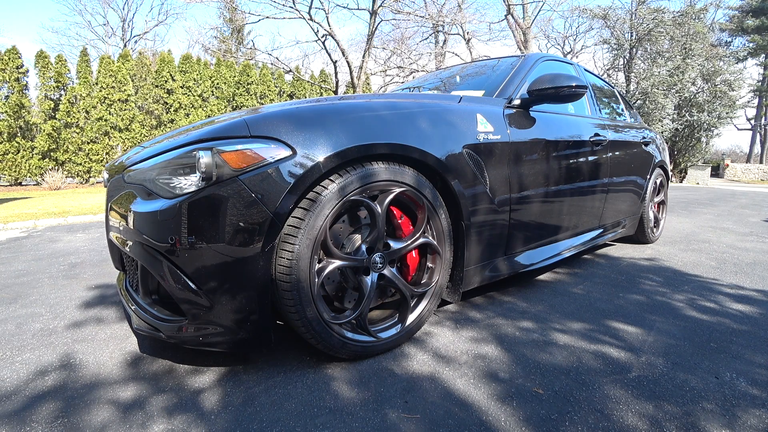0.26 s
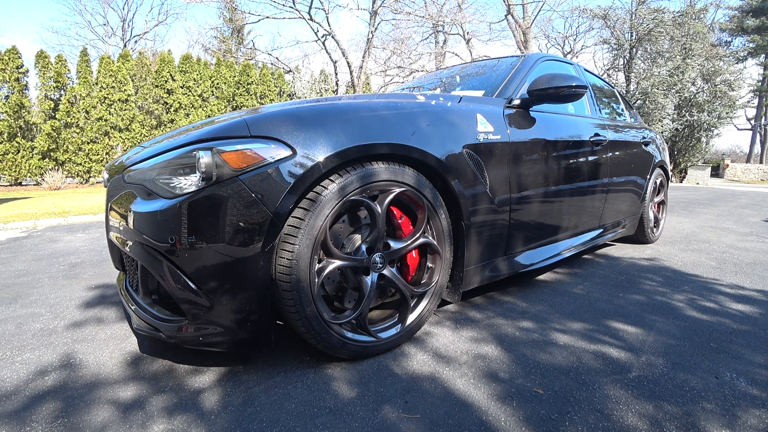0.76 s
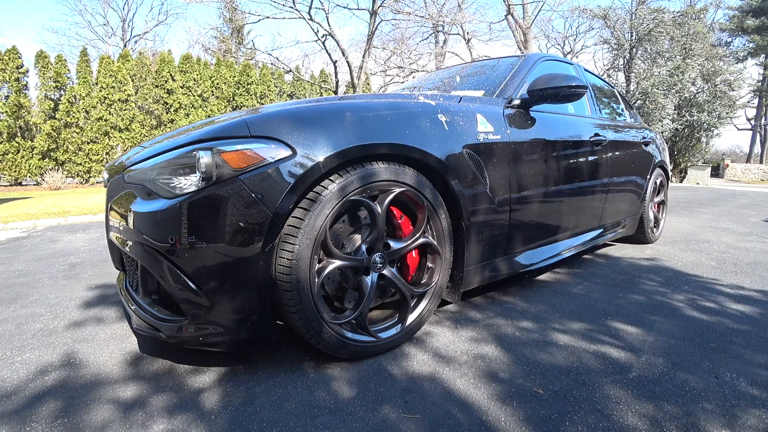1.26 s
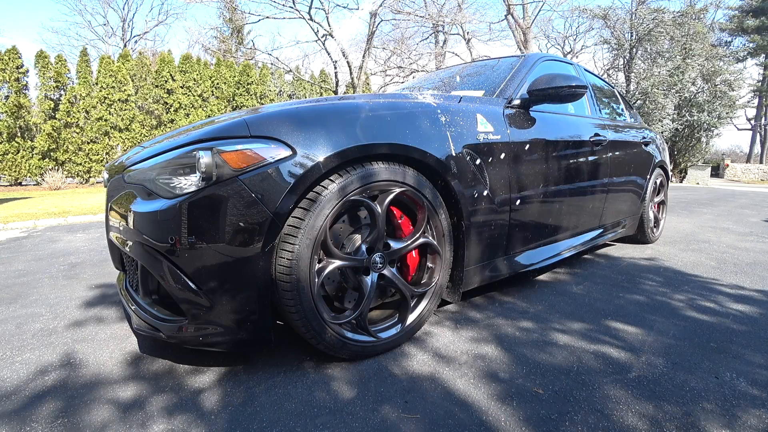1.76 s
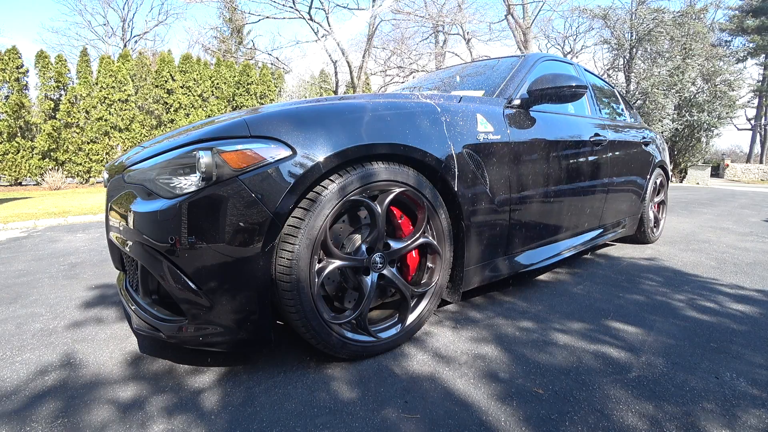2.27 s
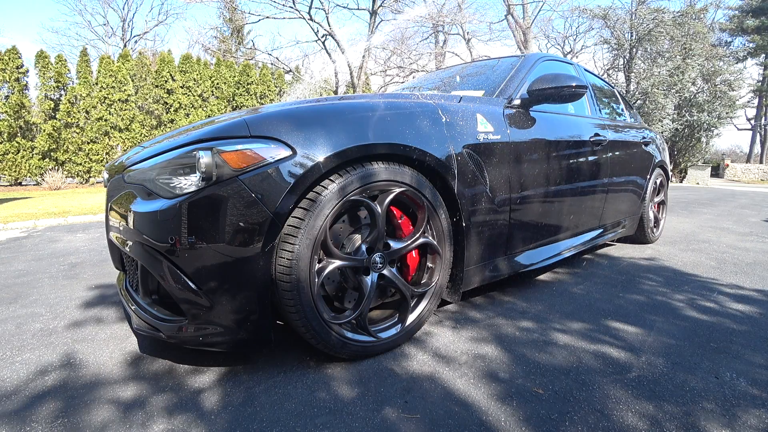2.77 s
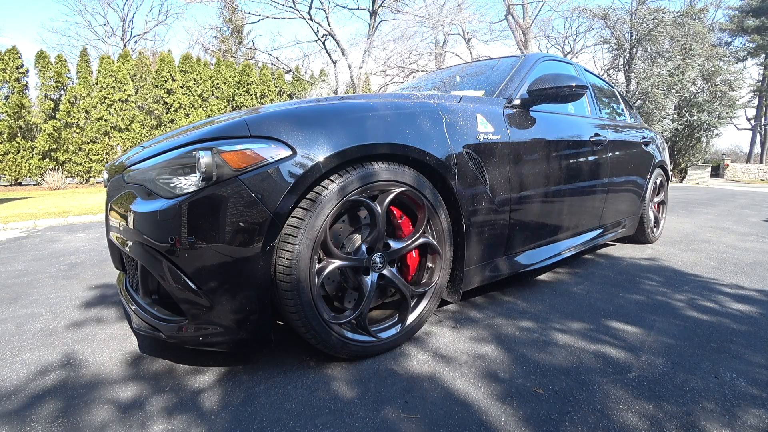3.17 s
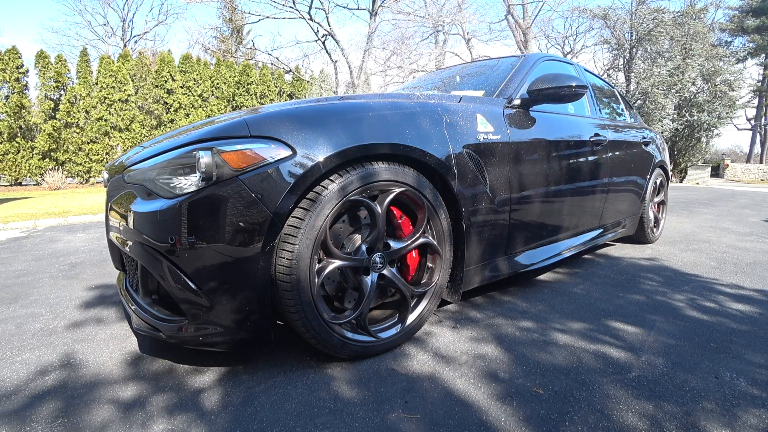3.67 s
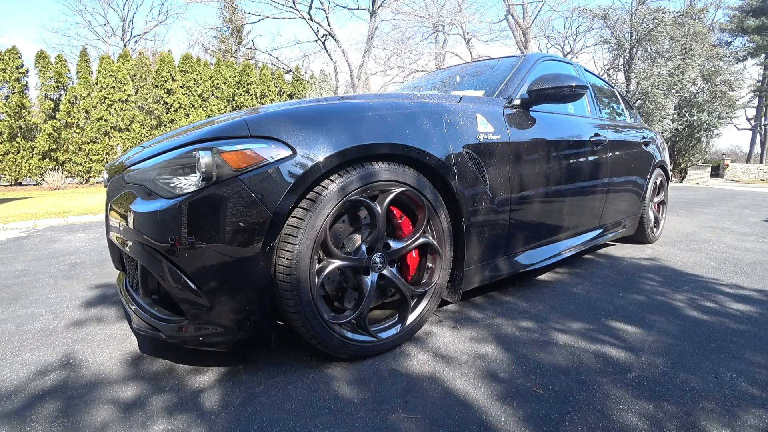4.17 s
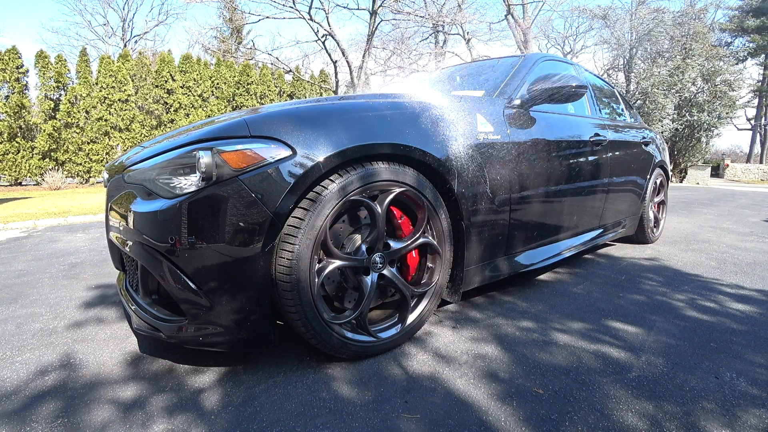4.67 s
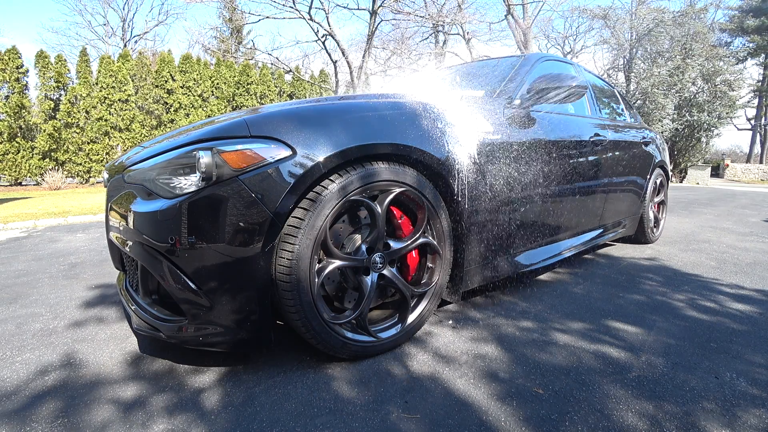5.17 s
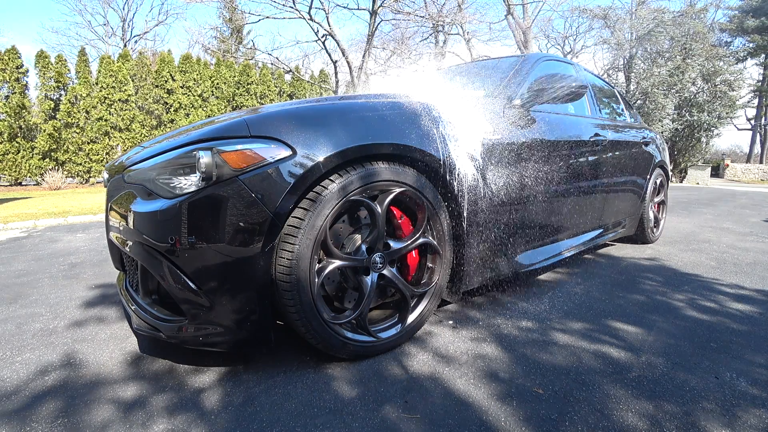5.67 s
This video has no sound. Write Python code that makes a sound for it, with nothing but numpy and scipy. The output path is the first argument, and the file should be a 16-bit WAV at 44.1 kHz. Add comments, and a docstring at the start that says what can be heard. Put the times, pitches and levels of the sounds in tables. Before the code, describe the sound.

A pressure washer with a foam cannon fires a short hissing burst that ends in a sputter, a few valve ticks and a faint metallic ring. After a brief pause the jet starts again and runs steadily, wet at first, then as a softer foamy hiss, and finally a little brighter as it hits a car. The spray is close and slightly to the right, in a quiet open driveway, with a faint pump whine behind it.

```python
"""A hissing spray, a little to the right: a pressure washer with a foam cannon on a car in an open driveway.
A short trial burst ends in a sputter, a few valve ticks and a ringing lance; then the jet runs steadily,
wet at first, then as a plume of foam, at last onto the paint. The jet is turbulence shaped by nozzle
resonances and echoed by asphalt and car. Behind it: a faint pump whine, one far bird, outdoor air."""
import sys
import numpy as np
from scipy import signal
from scipy.fft import rfft, irfft
from scipy.io import wavfile
from scipy.ndimage import map_coordinates

SR = 44100
rng = np.random.default_rng(int(sys.argv[2]) if len(sys.argv) > 2 else 0)


def wrap_up_sound(samples):
    """Save the sound to the file named by the first command line argument, as 16-bit audio."""
    columns = np.atleast_2d(samples).T
    # keep every value between -1 and 1, then stretch to whole-number steps
    tamed = np.clip(columns, -1, 1)
    steps = np.round(tamed * 32767).astype(np.int16)
    wavfile.write(sys.argv[1], SR, steps)


N = 261072
TIME = np.arange(N) / SR
HZ = np.maximum(np.arange(N // 2 + 1) * SR / N, 1)
CUTOFF_HZ = 11150
SAG_WIDTH_S = 0.061

# trigger pulls: (opens [s], shuts [s], rise [s], deepest pressure sag [s], sag depth [dB])
TRIGGER_PULLS = [(0.304, 0.6644, 0.0078, 0.483, 9), (1.2352, 6.5, 0.0011, 1.455, 8)]
# stereo image of the spray: (frequency [Hz], left-right correlation [0..1])
SPRAY_CORRELATION = [(60, .3), (130, .45), (270, .84), (600, .95), (1200, .92), (2500, .83), (5300, .84),
                     (11000, .64)]


def jet(sputter_db=0.34, fizz_db=-0.5, gulp_db=0.73, gulp_hz=25):
    """Uneven gulps of air and soap make the jet flutter, its roar most; bursting foam roughens its top."""
    # rows wet, plume, on paint: (roar [dB], rasp [dB], hiss [dB])
    stage_levels = [(-24.5, -28.5, -32.5), (-28, -28, -30.5), (-29, -29, -28.5)]
    # response to pressure, rows roar, rasp, hiss: (slope [dB/dB], lag [s])
    response = [(0.8, 0.002), (0.87, -0.005), (1.55, -0.0058)]
    # treble tilt as the wand sweeps: (time [s], hiss over rasp [dB])
    tilt = [(0.35, 0.5), (0.65, 2), (1.4, 2.5), (1.6, 4), (2.4, 1), (2.9, 1.4), (3.3, -1), (4.25, -2.4),
            (4.45, -1.5), (4.95, -2.7), (5.25, 1), (5.9, 1)]
    bands = zip(turbulence(), by_stage(stage_levels), response)
    roar, rasp, hiss = (band * from_db(db + slope * sag_db(lag_s)) for band, db, (slope, lag_s) in bands)
    tilt_db = np.interp(TIME, *np.transpose(tilt))
    treble = rasp * from_db(-tilt_db / 2) + hiss * from_db(tilt_db / 2)
    treble *= from_db(fizz_db * drift(700))
    roar *= from_db(gulp_db * drift(gulp_hz))
    return hollowed(roar + treble) * valve() * from_db(sputter_db * drift(110))


def turbulence(roar_top_hz=2500, rasp_top_hz=5000):
    """Noise through the nozzle resonances, coloured by stage and split into roar, rasp and hiss."""
    # jet turbulence: (frequency [Hz], relative density [dB])
    spectrum = [(130, -25), (250, -24), (480, -11.5), (700, -9), (1300, 0), (2100, -1.5), (2600, -4.5),
                (3500, 0), (4200, -1.5), (5100, -2), (6300, 0.5), (7600, -1.5), (9000, -6), (11000, -12)]
    # jet direction: (frequency [Hz], left over right [dB])
    balance = [(60, -1), (110, -11), (190, 1), (340, -1.5), (620, -1), (1100, -7.5), (1970, -8.5),
               (3520, -9.5), (6300, -6.0), (11300, -3.5)]
    # phase between the ears: (frequency [Hz], left lead [rad])
    phase = [(0, 0), (1460, -0.37), (1890, 0.56), (2410, -0.1), (3360, -0.77), (3960, -0.9), (4220, -0.3),
             (4820, -0.65), (6630, -0.7), (7240, -0.9), (7750, -0.21), (9220, -1.6), (10400, 0.73),
             (11500, -2.3)]
    # foam cannon resonances, then each stage's peaks and dips: (centre [Hz], width [Hz], unscaled lift [dB])
    nozzle = [(708, 178, 5.3), (957, 366, 9.6), (1367, 196, 6.4), (1662, 251, 5.9), (2015, 144, 7.3),
              (3140, 156, 4.1), (3430, 291, 8.4), (3734, 330, 8.2), (4365, 134, -1.1), (5768, 109, 5.1),
              (6029, 188, 6.1), (6263, 94, 5.7), (6546, 386, 6.0), (7141, 127, 4.2)]
    wet = [(1340, 960, 7.5), (2267, 150, 5.5), (2790, 290, 3), (4380, 1070, 10.5), (5050, 51, -5),
           (7050, 150, 7), (7900, 99, 2.5)]
    plume = [(1524, 961, 3.2), (4316, 90, 4.6), (4819, 77, -3.9), (5197, 97, 3.6), (5836, 115, 2.7),
             (7481, 116, -3.9), (8176, 190, -2.6)]
    on_paint = [(497, 67, 2.7), (2408, 785, 4.6), (5435, 104, 4.3), (5773, 130, -5.0), (7138, 173, -5.3),
                (8140, 149, -5.1), (9903, 695, -3.3)]
    noise = stereo_spectra(SPRAY_CORRELATION) * from_db(over_hz(spectrum) + resonance_db(nozzle))
    noise *= pan(over_hz(balance)) * np.exp(1j * over_hz(phase) * [[.5], [-.5]])
    staged = [noise * from_db(resonance_db(peaks)) for peaks in (wet, plume, on_paint)]
    low, high = (1 / (1 + (HZ / edge_hz) ** 10) for edge_hz in (roar_top_hz, rasp_top_hz))
    return [sum(share * unit_rms(irfft(spectra * band, N)) for share, spectra in zip(stages(), staged))
            for band in (low, high - low, 1 - high)]


def stages(foams_s=2.1, foam_blend_s=0.54, lands_s=4.46, land_blend_s=0.16):
    """Shares of wet jet, plume and jet on the paint; they sum to 1."""
    foam, landed = smooth_step(foams_s, foam_blend_s), smooth_step(lands_s, land_blend_s)
    return np.array([1 - foam, foam - landed, landed])


def valve(steepness=0.95, shut_decay_s=0.015, hose_db=-0.5):
    """Each pull opens on the pressure left in the hose, passes to the pump and holds until shut."""
    gain = 0
    for opens_s, shuts_s, rise_s, sag_s, _ in TRIGGER_PULLS:
        opening = np.exp(-(np.maximum(opens_s - TIME, 0) / rise_s) ** steepness)
        closing = np.exp(-np.maximum(TIME - shuts_s, 0) / shut_decay_s)
        gain += opening * closing * from_db(hose_db * (1 - smooth_step(sag_s, SAG_WIDTH_S)))
    return gain


def sag_db(lag_s):
    """Pressure dips once per pull: the hose empties before the pump catches up."""
    return -sum(depth_db * np.exp(-((TIME - lag_s - sag_s) / SAG_WIDTH_S) ** 2)
                for *_, sag_s, depth_db in TRIGGER_PULLS)


def hollowed(x, centre_hz=2200, width_hz=1100, db_per_db=0.67):
    """As pressure sags, the band between roar and rasp drops further and the jet sounds hollow."""
    band = irfft(rfft(x) / (1 + (2 * (HZ - centre_hz) / width_hz) ** 4), N)
    return x - band * (1 - from_db(db_per_db * sag_db(0)))


def spits(pan_db=-5, bottom_hz=300, rise_s=0.00037):
    """Slugs of water and air ring briefly in the water-filled nozzle, kept free of bass; the row at 0.6727 s is
    the click of the valve closing."""
    # (time [s], level [dB], centre [Hz], width [octaves], decay [s])
    slugs = [(0.3015, -15, 1200, 1.1, 0.0045), (0.6727, -25, 3000, 4, 0.0018),
             (0.712, -35.5, 780, 0.18, 0.03), (0.726, -34, 780, .15, 0.021), (0.755, -37, 4000, 1.4, 0.006),
             (0.76, -32, 4200, 0.45, 0.013), (0.763, -33, 767, 0.19, 0.0042),
             (0.781, -34, 1810, 0.7, 0.005), (1.2341, -18.5, 710, 1.64, 0.0055)]
    puffs = 0
    for start_s, db, hz, octaves, decay_s in slugs:
        edges_hz = np.minimum(hz * 2 ** (np.array([-.5, .5]) * octaves), CUTOFF_HZ)
        noise = rng.standard_normal(N)
        puff = filtered(noise * gate(start_s, start_s, rise_s, decay_s), 2, edges_hz, "band")
        puffs += from_db(db) * puff / np.std(filtered(noise, 2, edges_hz, "band"))
    return filtered(puffs, 3, bottom_hz, "high") * pan(pan_db)


def drops(level_db=-35, patter_db=4.0, pan_db=-4, rise_s=0.0087, decay_s=0.091):
    """After the valve shuts, drops still in flight patter down and fade."""
    # landing drops: (frequency [Hz], relative density [dB])
    spectrum = [(180, -58), (300, -32), (775, -8), (1480, -16), (1620, -8), (1750, -9), (1940, -7.5),
                (3150, -17), (6020, -23.5), (11000, -37), (14300, -67), (22000, -120)]
    shuts_s = TRIGGER_PULLS[0][1]
    patter = coloured_noise(spectrum, SPRAY_CORRELATION) * from_db(level_db + patter_db * drift(300))
    return patter * gate(shuts_s, shuts_s, rise_s, decay_s) * pan(pan_db)


def valve_ticks(housing_hz=(1600, 4500), edge_gain=0.19, tail_s=0.0098, tail_db=-22, bottom_hz=700):
    """The valve snaps as pressure dies away: sharp clicks coloured by the gun's housing, with brief tails."""
    # (time [s], relative level [dB], left over right [dB])
    snaps = [(0.8178, -30, 1.5), (0.8248, -30, 3), (0.839, -25, 1.5), (0.8538, -17, -2), (0.857, -25, 1.5),
             (0.872, -38, 5)]
    # rattle after a snap: (frequency [Hz], relative density [dB])
    tail_spectrum = [(400, -18), (1000, -3), (1900, 10), (3800, 1), (5500, -17), (11000, -15)]
    impulse = signal.unit_impulse(SR // 100)
    click = filtered(impulse, 1, housing_hz, "band") + edge_gain * impulse
    blows = np.zeros((2, N))
    for start_s, db, pan_db in snaps:
        blows[:, [round(start_s * SR)]] = from_db(db) * pan(pan_db)
    clicks = signal.fftconvolve(blows, [2 * click / np.ptp(click)])[:, :N]
    rattle = coloured_noise(tail_spectrum, SPRAY_CORRELATION)
    tails = rattle * sum(from_db(db + tail_db) * gate(s, s, .0002, tail_s) for s, db, _ in snaps)
    return filtered(clicks + tails, 2, bottom_hz, "high")


def lance(start_s=0.762, rise_s=0.006, pan_db=9.0):
    """The jolt of the closing valve leaves the metal ringing."""
    # (frequency [Hz], level [dB], T60 [s])
    modes = [(873, -40, 1.2), (1674, -47, 0.66), (3230, -49, 0.49)]
    age_s = np.maximum(TIME - start_s, 0)
    ring = sum(from_db(db - 60 * age_s / t60_s) * np.sin(2 * np.pi * hz * TIME) for hz, db, t60_s in modes)
    return ring * gate(start_s, TIME[-1], rise_s, 1) * pan(pan_db)


def driveway(x, asphalt_gain=0.29, car_gain=0.041):
    """Two early echoes comb the sound; the combs slide with the aim."""
    # echo delays, rows wet, plume, on paint: (asphalt [ms], car [ms])
    delays = [(3.145, 1.32), (3.055, 1.403), (2.953, 1.485)]
    asphalt_ms, car_ms = by_stage(delays)
    return x + asphalt_gain * delayed(x, asphalt_ms) + car_gain * delayed(x, car_ms)


def panels(x, scatter_db=-6.5, first_ms=3.5, decay_ms=8, bottom_hz=2600):
    """Curved panels, glass and wheel return many faint treble reflections that finely comb the hiss."""
    ms = TIME[:SR // 10] * 1000
    reflections = rng.standard_normal(len(ms)) * (ms > first_ms) * np.exp(-ms / decay_ms)
    scattered = signal.fftconvolve(x, [reflections / np.linalg.norm(reflections)])[:, :N]
    return x + from_db(scatter_db) * filtered(scattered, 1, bottom_hz, "high")


def pump(trim_db=-2, waver_hz=2.44, rise_s=0.63):
    """A faint, unsteady whine under load, fading in with the second pull."""
    # (frequency [Hz], level before trim [dB])
    whine = [(753.7, -44.5)]
    hz, db = whine[0]
    envelope = gate(TRIGGER_PULLS[1][0], TIME[-1], rise_s, 1)
    return from_db(db + trim_db) * tone(hz + waver_hz * drift(5.6)) * envelope


def bird(start_s=0.12, length_s=0.145, from_hz=2500, to_hz=3200, glide_s=0.028, waver_hz=25,
         level_db=-64, fade_db_per_s=45, flutter_db=4.5):
    """One thin, slightly rough far call that slides up and fades as it levels off."""
    age_s = np.maximum(TIME - start_s, 0)
    hz = to_hz + (from_hz - to_hz) * np.exp(-age_s / glide_s) + waver_hz * drift(100)
    gain = from_db(level_db - fade_db_per_s * age_s + flutter_db * drift(80))
    return gain * tone(hz) * gate(start_s, start_s + length_s, .01, .01)


def outdoors(air_db=-56, waver_db=1.0, rustle_hz=3600, rustle_db=-57, rustle_decay_s=0.081):
    """Still air with a far murmur, and a brief high rustle at the start."""
    # murmur: (frequency [Hz], relative density [dB])
    spectrum = [(15, -71), (25, -37), (54, -15.5), (145, -10.5), (241, -13.5), (267, -10.5), (362, -6),
                (456, -11), (884, -6.5), (2270, -18.5), (3080, -21), (3590, -24), (11000, -36.5),
                (14300, -77), (22000, -120)]
    # its stereo image: (frequency [Hz], left-right correlation [0..1])
    correlation = [(50, 0.76), (300, 0.97), (1000, 0.72), (3000, 0.24), (10000, .1)]
    air = coloured_noise(spectrum, correlation)
    rustle = unit_rms(irfft(stereo_spectra(correlation) / (1 + (2 * np.log2(HZ / rustle_hz)) ** 4), N))
    rustle *= from_db(rustle_db) * gate(0, 0, .002, rustle_decay_s)
    return air * from_db(air_db + waver_db * drift(6.9)) + rustle


def from_db(db):
    """Decibels to gain."""
    return 10 ** (np.asarray(db) / 20)


def unit_rms(x):
    """Scale the channel mean to rms 1."""
    return x / np.sqrt(np.mean(np.atleast_2d(x).mean(axis=0) ** 2) + 1e-20)


def over_hz(points):
    """Interpolate a table over log frequency."""
    hz, values = np.transpose(points)
    return np.interp(np.log(HZ), np.log(hz), values)


def by_stage(rows):
    """Blend one row per stage into one curve per column."""
    return np.transpose(rows) @ stages()


def resonance_db(peaks, scale=1.105):
    """Bell-shaped peaks and dips over frequency."""
    return scale * sum(db / (1 + (2 * (HZ - hz) / width_hz) ** 2) for hz, width_hz, db in peaks)


def gate(start_s, end_s, rise_s, decay_s):
    """Linear rise, hold, exponential decay."""
    return np.clip((TIME - start_s) / rise_s, 0, 1) * np.exp(-np.maximum(TIME - end_s, 0) / decay_s)


def smooth_step(centre_s, width_s):
    """From 0 to 1 around a moment."""
    return .5 + .5 * np.tanh((TIME - centre_s) / width_s)


def pan(left_over_right_db):
    """Left and right gains with mean 1."""
    gains = from_db(np.array([[.5], [-.5]]) * left_over_right_db)
    return gains / gains.mean(axis=0)


def tone(hz):
    """Sine of moving frequency."""
    return np.sin(2 * np.pi * np.cumsum(hz) / SR)


def drift(rate_hz):
    """Low-passed noise, rms 1."""
    return unit_rms(irfft(rfft(rng.standard_normal(N)) / (1 + (HZ / rate_hz) ** 2), N))


def stereo_spectra(correlation):
    """Spectra of two partly correlated white noises."""
    mid, side = rfft(rng.standard_normal((2, N)))
    alike = np.clip(over_hz(correlation), -1, 1)
    return np.sqrt(1 + alike) * mid + np.sqrt(1 - alike) * side * [[1], [-1]]


def coloured_noise(spectrum, correlation):
    """Stereo noise of a given spectrum, rms 1."""
    return unit_rms(irfft(stereo_spectra(correlation) * from_db(over_hz(spectrum)), N))


def filtered(x, order, hz, kind):
    """Butterworth filter."""
    return signal.sosfilt(signal.butter(order, hz, kind, fs=SR, output="sos"), x)


def delayed(x, ms):
    """Moving delay on both channels."""
    return np.array([map_coordinates(side, [(TIME - ms * 1e-3) * SR], order=3) for side in x])


def scene():
    """The jet and its echoes over the quiet of the driveway."""
    spray = panels(driveway(jet() + spits()) + drops())
    return spray + valve_ticks() + lance() + pump() + bird() + outdoors()


def record(dry):
    """Steep low-pass."""
    return signal.sosfilt(signal.ellip(12, .1, 80, CUTOFF_HZ, fs=SR, output="sos"), dry)


dry = scene()
out = record(dry)
wrap_up_sound(out)
```